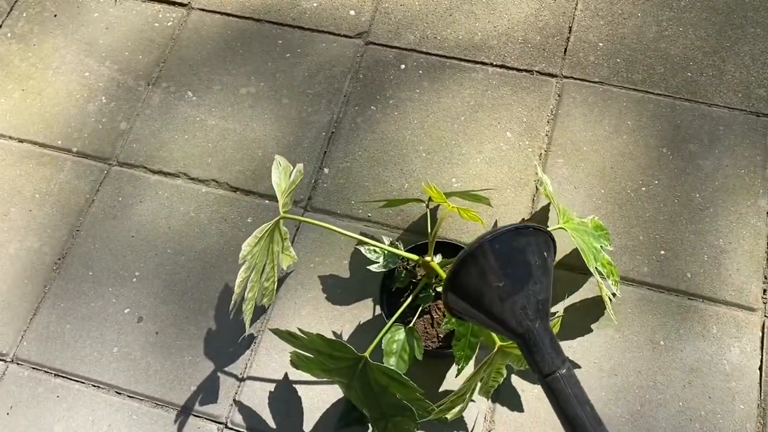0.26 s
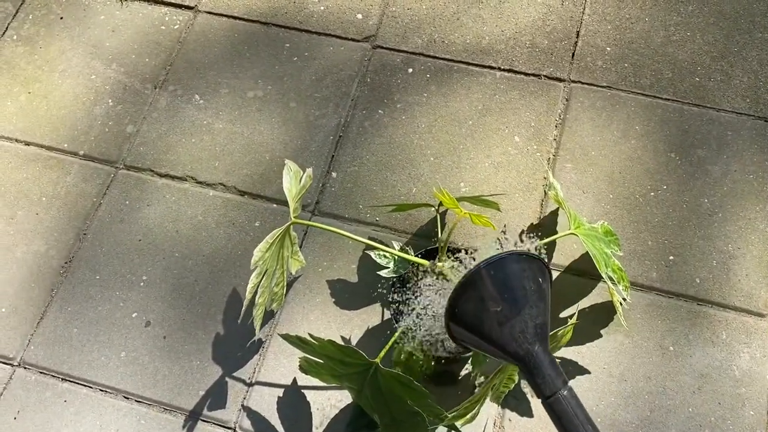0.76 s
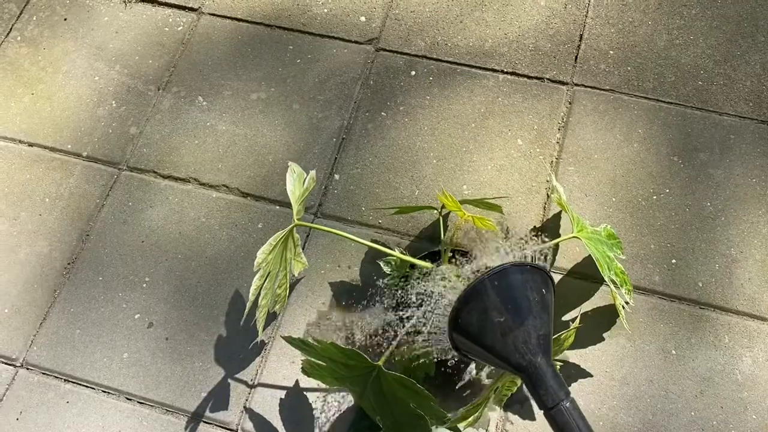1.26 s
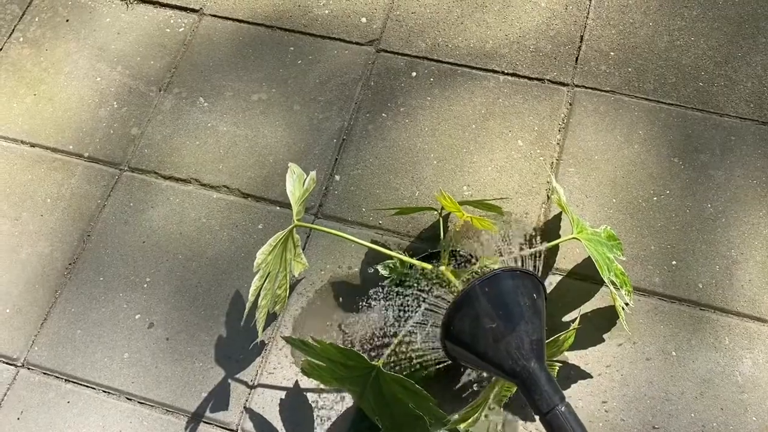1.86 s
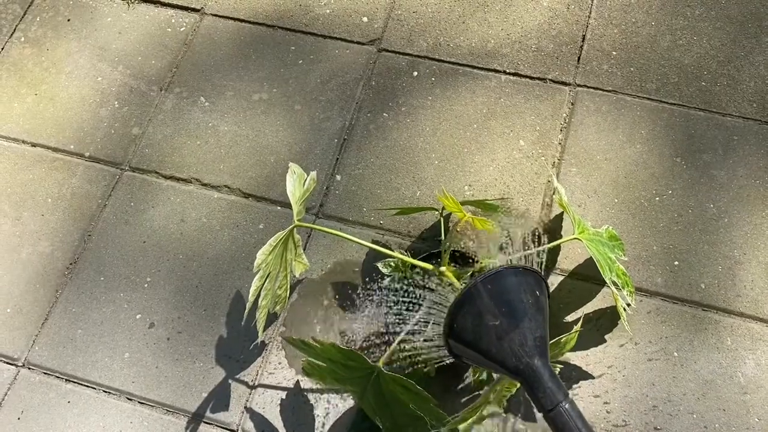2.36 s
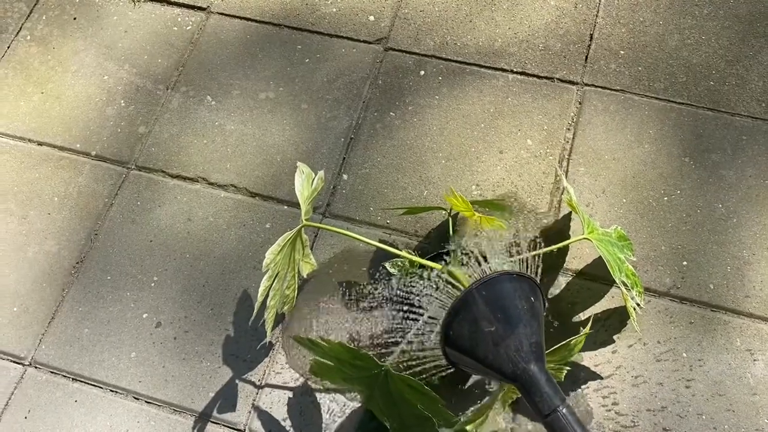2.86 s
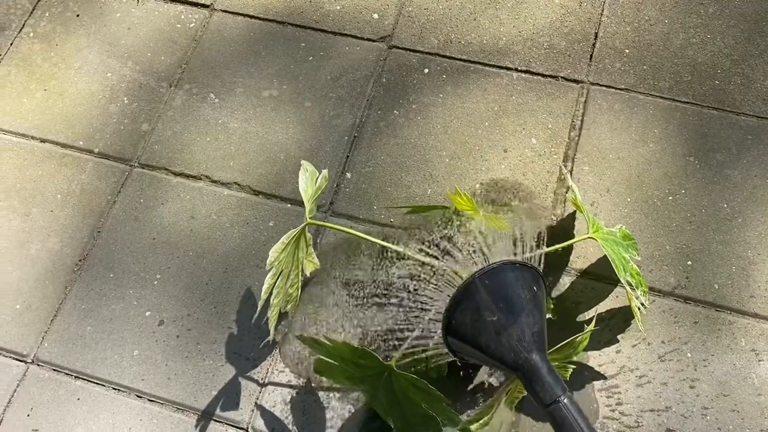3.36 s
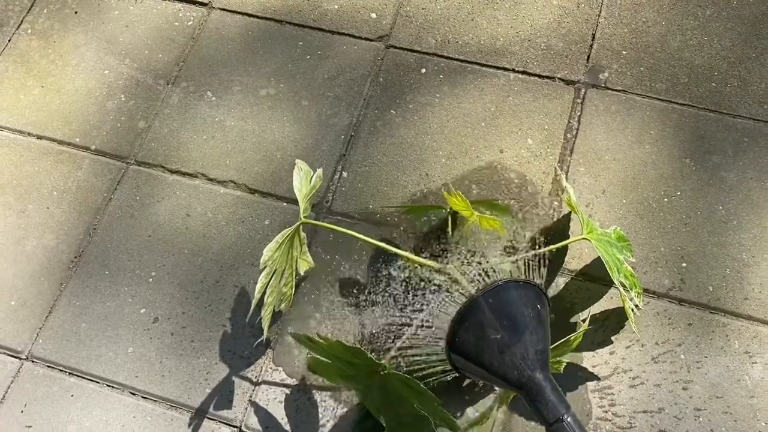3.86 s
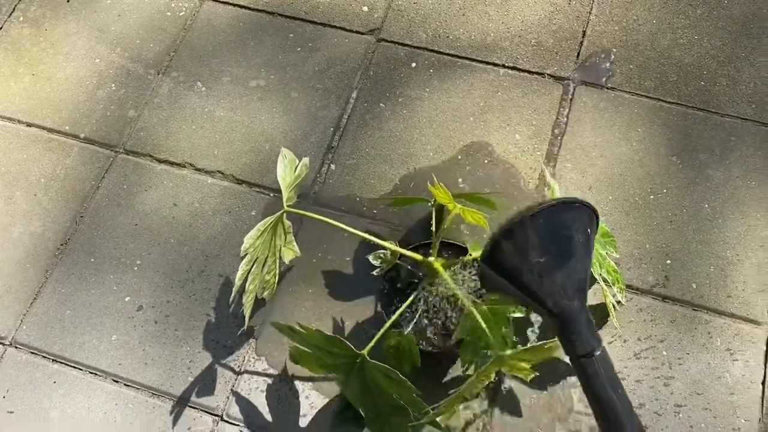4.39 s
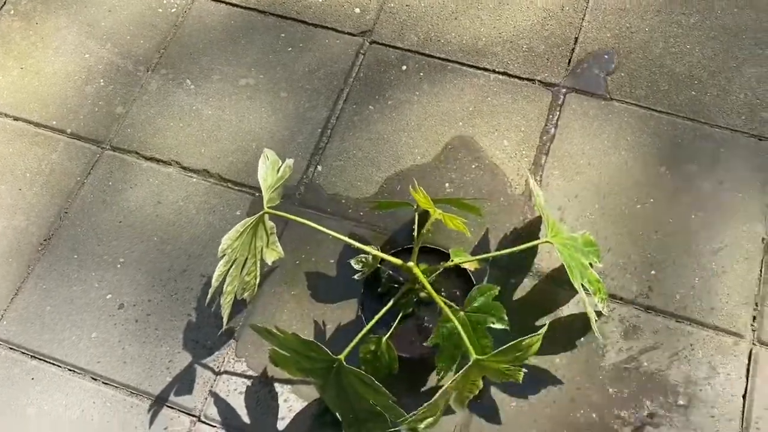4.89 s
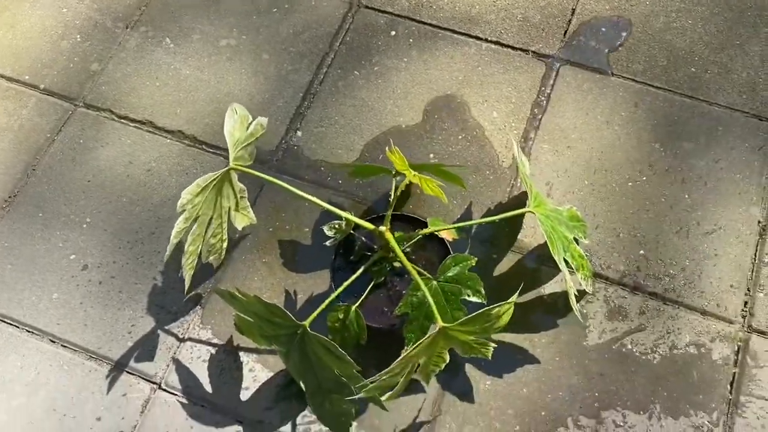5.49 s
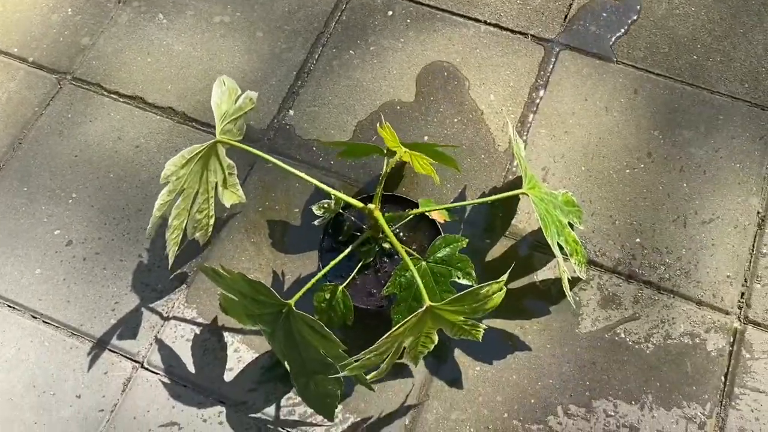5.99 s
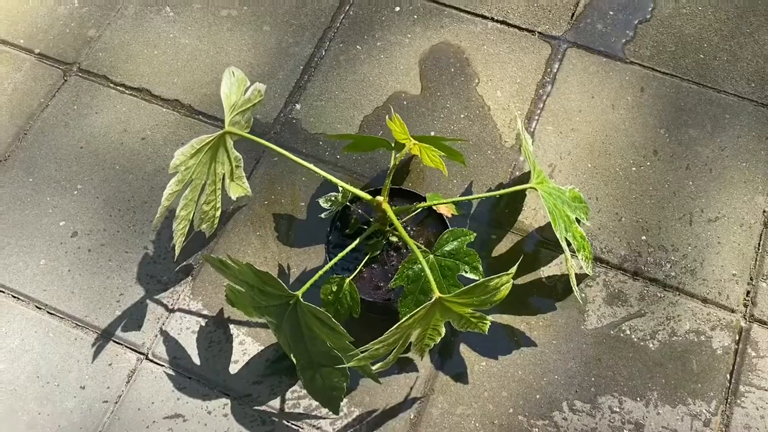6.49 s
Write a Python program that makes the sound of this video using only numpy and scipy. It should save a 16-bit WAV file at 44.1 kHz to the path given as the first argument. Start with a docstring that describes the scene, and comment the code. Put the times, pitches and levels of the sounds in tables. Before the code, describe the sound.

On a paved patio, a plastic watering can gurgles and starts showering a potted plant. Drops patter on leaves and wet soil while fine jets hiss and splat on the stone. After about five seconds the water dwindles to drips, and the can is set down with hollow, gritty knocks, rocking and sliding briefly. The sound is close and in stereo, with faint traffic rumbling far away.

```python
"""On a paved patio, a plastic watering can showers a potted plant through its sprinkler head.
Drops patter on leaves and wet soil, fine jets hiss on the stone, big drops splat and the water gurgles.
The can is set down: it knocks and rocks, its walls ring, the air inside hums and its base slides on sand.
Far traffic rumbles and a bird whistles faintly. Left and right are heard a few centimetres apart."""
import sys
import numpy as np
from scipy import signal
from scipy.fft import rfft, irfft, next_fast_len
from scipy.io import wavfile

SR = 44100
rng = np.random.default_rng(int(sys.argv[2]) if len(sys.argv) > 2 else 0)


def store_wav(level_fs):
    """Save 16-bit WAV to argv[1]."""
    pcm = np.round(np.clip(np.atleast_2d(level_fs), -1, 1) * 32767)
    wavfile.write(sys.argv[1], SR, pcm.T.astype(np.int16))


N = 297357
AHEAD_LAG_S, ASIDE_LAG_S = 2.3e-5, 1.81e-4   # left-side delay for the plant ahead and the paving aside


def from_db(db):
    """Turn decibels into a multiplier."""
    return 10 ** (np.asarray(db) / 20)


def unit_level(x):
    """Scale a sound to an average (rms) level of 1."""
    return x / np.sqrt(np.mean(x ** 2) + 1e-20)


def over_time(rows):
    """Join rows of (time_s, values...) with straight lines: one curve for each value column."""
    times_s, *columns = np.transpose(rows)
    return [np.interp(np.arange(N) / SR, times_s, column) for column in columns]


def at_pitch(points, hz):
    """Read between the rows of a (pitch_hz, value) table."""
    pitches_hz, values = np.transpose(points)
    return np.interp(np.log(hz), np.log(pitches_hz), values)


def drift(rate_hz):
    """A smooth random wobble of typical size 1; a higher rate wobbles faster."""
    r = np.exp(-80 * np.pi * rate_hz / SR)
    slow = signal.lfilter([1], [1, -2 * r, r * r], rng.standard_normal(N // 40 + 2002))[2000:]
    return np.interp(np.arange(N) / 40, np.arange(len(slow)), unit_level(slow))


def ring(push, hz, fade_s):
    """A pushed object rings at one pitch. Here and below, a fade time is the time to fall by 60 dB."""
    r, w = from_db(-60 / (fade_s * SR)), 2 * np.pi * hz / SR
    return signal.lfilter([0, np.sin(w)], [1, -2 * r * np.cos(w), r * r], push + 1e-18)


def grains(per_s, spread_db):
    """Tiny impacts: random clicks of uneven size."""
    sizes = from_db(spread_db * np.minimum(rng.exponential(1, N), 5)) * rng.choice([-1, 1], N)
    return unit_level(sizes * (rng.random(N) < per_s / SR))


def bands(sources, spectrum, flicker_db, flicker_hz):
    """Yield (pitch, sound) for flickering third-octave bands, cut from two sources in turn."""
    together, edges = drift(2.5), 20 * 2 ** np.arange(0, 10, 1 / 3)
    for k, (low, high) in enumerate(zip(edges, edges[1:])):
        hz = np.sqrt(low * high)
        if spectrum[0][0] < hz * 1.2 and hz < spectrum[-1][0] * 1.2:
            band = signal.sosfilt(signal.butter(2, [low, high], "band", fs=SR, output="sos"), sources[k % 2])
            flicker = 0.3 * together + drift(flicker_hz)
            yield hz, band * from_db(at_pitch(spectrum, hz) + flicker_db * flicker)


def left_and_right(sound, lag_s):
    """The housing between two microphones colours each side differently; the left one hears later."""
    # How much louder the left side is: pitch_hz, difference_db
    tilt = [(400, 1.5), (700, -5), (1300, 5), (2400, 7.5), (4400, 6), (8100, 3.5), (15000, -2.5)]
    size = next_fast_len(N + 512)
    hz = np.arange(size // 2 + 1) * SR / size
    half = from_db(at_pitch(tilt, hz + 1) / 2) * np.exp(-1j * np.pi * hz * lag_s)
    return irfft(rfft(sound, size) * [half, 1 / half], size)[:, :N]


def traffic():
    """Far traffic blends into a smooth rumble, nearly the same on both sides in the bass."""
    # Tone of the rumble: pitch_hz, relative_db
    spectrum = [(12, -46), (20, -19.5), (74, -1.5), (241, -15.5), (332, -21.5), (538, -21), (762, -20.5),
                (1450, -26.5), (3060, -40.5), (5380, -92), (22000, -120)]
    # Its slow rise and fall: time_s, level_db
    swell = [(0, -53.5), (1, -52), (2, -52), (3, -54), (4, -57), (5, -54), (5.6, -57.5), (6.74, -57.5)]
    # How alike left and right are: pitch_hz, likeness (1 = the same)
    likeness = [(60, 0.96), (250, 0.81), (700, 0.33), (4000, 0.048)]
    out, noise = 0, rng.standard_normal((2, 2, N))
    for hz, (middle, side) in bands(noise, spectrum, flicker_db=1.92, flicker_hz=3.53):
        alike = at_pitch(likeness, hz)
        out = out + np.sqrt(1 + alike) * middle + np.sqrt(1 - alike) * side * [[1], [-1]]
    return from_db(over_time(swell)[0]) * unit_level(out)


def shower():
    """Water patters on the plant ahead and sprays the paving aside, with splats and sounds from the can."""
    # Level of patter and hiss: the shower until about 5.4 s, then faint dripping as the can is set down:
    # time_s, patter_db, spray_db
    levels = [(0, -74, -99), (.45, -70, -82), (.8, -64.5, -64.5), (1.15, -65.5, -64), (1.36, -62.5, -59),
              (2.1, -63, -57.5), (2.45, -61.5, -55), (3.0, -60, -58), (3.3, -58.5, -55.5),
              (3.9, -58, -57.5), (4.4, -64.5, -59), (4.8, -66.5, -61), (5.0, -65, -69), (5.25, -69.5, -73),
              (5.45, -76.5, -83.5), (5.78, -87, -79.5), (6.0, -71, -77), (6.74, -72, -75)]
    # Tone of drops on leaves and puddle: pitch_hz, relative_db
    patter_tone = [(300, 3.5), (600, -8), (1200, 1.5), (1800, 1.5), (2600, 3.5), (3600, -1), (4800, 1),
                   (6200, -14), (8000, -43)]
    # Tone of the fine jets: pitch_hz, relative_db
    spray_tone = [(4200, -7), (5500, -4.5), (7000, 7), (8600, 3.5), (11000, 2.5), (13500, 14.5),
                  (16000, -11)]
    patter_db, spray_db = over_time(levels)
    on_plant, on_paving = splats()
    patter = droplets(patter_tone, per_s=3000, spread_db=2.7, scatter_db=-6)
    patter += from_db(-11.5) * soil_plips(2050, 4050, per_s=90, spread_db=5)
    patter += from_db(-8.5) * plinks(2380, 4940, per_s=200, cycles=11, spread_db=1)
    spray = droplets(spray_tone, per_s=7000, spread_db=4, scatter_db=-11.5)
    spray += from_db(-17) * plinks(4450, 14000, per_s=200, cycles=22, spread_db=2.5)
    smallest_drops = grains(per_s=60 * from_db(4 * drift(1.6)), spread_db=2.7)
    spray += from_db(-10) * unit_level(snaps(smallest_drops))
    ahead = from_db(patter_db) * patter + on_plant + gurgles_and_can_notes() + bumps() + hollow_hum()
    aside = from_db(spray_db) * spray + on_paving
    return left_and_right(ahead, AHEAD_LAG_S) + left_and_right(aside, ASIDE_LAG_S)


def droplets(spectrum, per_s, spread_db, scatter_db):
    """Thousands of impacts a second blur together; a scattered share is opposite in left and right."""
    drops = [[grains(per_s, spread_db) for _ in range(2)] for _ in range(2)]
    direct, scattered = sum(band for _, band in bands(drops, spectrum, flicker_db=4, flicker_hz=24))
    return unit_level(direct + from_db(scatter_db) * scattered * [[1], [-1]])


def plip(hz, cycles=8.2, rise=0.098):
    """A trapped bubble swells, rings and rises in pitch; one row of sound for each pitch given."""
    age = np.arange(600) / SR * np.reshape(hz, (-1, 1)) / cycles
    shape = 4 * age * np.exp(1 - 4 * age)
    return shape * np.sin(2 * np.pi * cycles * age * (1 - rise / 2 + rise * age))


def soil_plips(low_hz, high_hz, per_s, spread_db):
    """Drops fall in bunches on the puddled soil, each making a bubble."""
    starts = np.flatnonzero(rng.random(N) < per_s * from_db(3.5 * drift(13)) / SR)
    pitch, size = rng.random((2, N))[:, starts]
    gains = from_db(-spread_db * np.log(.01 + size))
    bubbles = plip(low_hz * (high_hz / low_hz) ** pitch) * gains[:, None]
    out = np.zeros(N + 600)
    np.add.at(out, starts[:, None] + np.arange(600), bubbles)
    return unit_level(out[:N])


def plinks(low_hz, high_hz, per_s, cycles, spread_db):
    """Drops come in clusters; each traps a bubble that rings briefly at one of twelve steady pitches."""
    clicks = grains(per_s * from_db(3.8 * drift(13)), spread_db)
    out, pitch_choice = 0, rng.integers(0, 12, N)
    for k, hz in enumerate(np.geomspace(low_hz, high_hz, 12)):
        rounded_start = ring(clicks * (pitch_choice == k), hz, 6 / hz)
        out = out + ring(rounded_start, hz, cycles / hz)
    return unit_level(out)


def snaps(clicks, low_hz=5000, fade_s=.006):
    """A drop snaps as it hits: each click becomes a short bright crack."""
    t = np.arange(1000) / SR
    burst = rng.standard_normal(len(t)) * from_db(-60 * t / fade_s)
    crack = signal.sosfilt(signal.butter(2, low_hz, "high", fs=SR, output="sos"), burst)
    return signal.fftconvolve(clicks, crack / np.abs(crack).max())[:N]


def bird():
    """A far bird gives a thin, wavering whistle that steps down in pitch."""
    # Path of the whistle: time_s, pitch_hz, level_db
    song = [(.08, 5450, -95), (.13, 5450, -84), (.19, 5420, -95), (.215, 5320, -79), (.24, 5280, -90),
            (.25, 4900, -84), (.28, 4870, -78), (.3, 4870, -90), (.41, 4900, -92)]
    hz, level_db = over_time(song)
    t = np.arange(N) / SR
    singing = np.clip(np.minimum(t - song[0][0], song[-1][0] - t) / 0.03, 0, 1)
    phase = 2 * np.pi * np.cumsum(hz * (1 + 0.004 * drift(120))) / SR
    return singing * from_db(level_db + 3.1 * drift(40)) * np.sqrt(2) * np.sin(phase)


def fading_tones(rows, octaves_per_s):
    """Each row rings as a pure, dying tone whose pitch may glide for the first 0.05 s."""
    out, t = np.zeros(N + 16000), np.arange(16000) / SR
    for start_s, level_db, hz, fade_s in rows:
        phase = 2 * np.pi * np.cumsum(hz * 2 ** (octaves_per_s * np.minimum(t, .05))) / SR
        onset = (1 - np.exp(-t * hz * 2.5)) ** 2
        out[round(start_s * SR):][:16000] += from_db(level_db - 60 * t / fade_s) * onset * np.sin(phase)
    return out[:N]


def gurgles_and_can_notes():
    """Short tones that rise a little and flutter: gurgles in the water, and notes of the can as it knocks."""
    # Short ringing tones: start_s, level_db, pitch_hz, fade_s
    tones = [(.472, -31.5, 392, 0.049), (.472, -37, 643, 0.024), (.486, -31.5, 399, 0.06),
             (.5975, -42.5, 820, 0.028), (.727, -39, 745, 0.048), (.9255, -28.5, 403, 0.029),
             (.937, -31.5, 445, 0.028), (.955, -45, 372, 0.087), (4.428, -52.5, 372, 0.18),
             (4.798, -30.5, 376, 0.075), (4.94, -37, 450, 0.037), (4.958, -39.5, 507, 0.057),
             (4.985, -39.5, 1850, 0.027), (4.986, -33, 354, 0.056), (5.003, -39, 1390, 0.034),
             (5.015, -30.5, 346, 0.065), (5.307, -45, 925, 0.081), (5.343, -33, 765, 0.066),
             (5.446, -51.5, 965, 0.077), (5.328, -46, 1700, 0.064), (5.443, -47, 1320, 0.017),
             (5.805, -35, 1514, 0.058), (5.806, -27, 1663, .05), (5.888, -33, 1697, 0.029),
             (5.968, -48, 1500, 0.032), (6.036, -31, 894, 0.023), (6.038, -45.5, 464, 0.23),
             (6.266, -41, 1280, 0.065), (6.281, -37, 1240, 0.035), (6.294, -37, 670, 0.038),
             (6.345, -43, 434, 0.036), (6.417, -32.5, 420, 0.027)]
    return fading_tones(tones, octaves_per_s=1.24) * from_db(3.5 * drift(112))


def splats():
    """Big drops burst into a dying spatter: lower ones on the plant, higher ones on the paving."""
    # The biggest drops landing: start_s, level_db, pitch_hz
    drops = [(0.4874, -53, 2550), (0.519, -54.5, 2040), (0.533, -55, 2000), (0.5766, -46, 1690),
             (0.602, -44, 1780), (0.646, -51, 2620), (0.683, -59, 3100), (0.723, -48, 1096),
             (0.735, -46, 2130), (0.7495, -50.5, 2880), (1.029, -47, 2860), (1.0632, -50.5, 3000),
             (1.2065, -34.5, 11000), (1.234, -38.5, 10400), (1.3044, -36, 8100), (1.349, -50, 3000),
             (1.364, -45, 5700), (1.394, -42.5, 5300), (1.435, -50, 4860), (1.506, -49.5, 2880),
             (1.534, -38, 7800), (1.55, -44, 7000), (1.57, -51, 2400), (1.621, -45, 7100),
             (1.899, -39.5, 7600), (1.928, -39.5, 10300), (1.96, -34.5, 10600), (2.021, -42, 10800),
             (2.169, -42, 4730), (2.2305, -45.5, 9900), (2.247, -35, 7800), (2.2674, -40, 10400),
             (2.285, -31, 13000), (2.303, -40, 8900), (2.343, -45, 2240), (2.347, -38, 10500),
             (2.4131, -43, 7700), (2.4406, -47, 4530), (2.489, -34, 12400), (2.511, -33.5, 10600),
             (2.7237, -29.5, 7400), (2.842, -43, 4800), (2.9163, -42, 13100), (2.9353, -45.5, 4440),
             (2.9835, -44.5, 2530), (3.2792, -36.5, 10500), (3.3171, -38, 7000), (3.337, -50, 2920),
             (3.3538, -46.5, 2930), (3.4055, -40, 3030), (3.434, -41, 7400), (3.442, -50, 3600),
             (3.463, -48, 7450), (3.5166, -43, 7300), (3.6086, -46, 2640), (3.632, -52, 2760),
             (3.726, -49, 2490), (3.756, -46, 2430), (3.796, -50, 2600), (3.863, -55, 2100),
             (3.871, -50, 2780), (3.883, -56, 2730), (3.932, -48, 2360), (3.9405, -50, 2270),
             (3.9737, -39, 6050), (3.9753, -43.5, 3050), (4.2107, -39, 6470), (4.2262, -39, 4500),
             (4.2594, -38.5, 2920), (4.3456, -44, 3140), (4.436, -41.5, 4530), (4.448, -38.5, 5040),
             (4.594, -36, 7700), (4.6463, -41, 10700), (4.673, -40.5, 12100), (4.7156, -37, 13300),
             (4.738, -43, 11000), (4.7554, -40, 11700), (4.839, -54, 9000), (4.8983, -38, 10870),
             (4.938, -45.5, 3200), (4.938, -35, 6900), (4.958, -31.5, 6900), (5.0466, -36, 7250),
             (5.069, -41, 10300), (5.1362, -32.5, 12500), (5.151, -45, 8900), (5.193, -44.5, 7560),
             (5.2162, -52.5, 2930), (5.262, -52, 2900)]
    out, paving_clicks, t = np.zeros((2, N + 4000)), np.zeros(N), np.arange(4000) / SR
    shape = (len(drops), 4000)
    spatters = rng.standard_normal(shape) * from_db(2 * rng.exponential(1, shape))
    spatters *= 1 + from_db(15) * np.exp(-t / .0025)   # the burst is stronger than what follows
    spatters *= 1 - np.exp(-t / .0005)   # and takes a moment to swell
    for (start_s, level_db, hz), spatter in zip(drops, spatters):
        start, paving = round(start_s * SR), int(hz > 5500)
        fade_s, cycles = (0.34, 7) if paving else (0.027, 20)
        push = np.diff(spatter * from_db(-60 * t / fade_s), prepend=0)
        burst = ring(push, hz, cycles / hz)
        burst = ring(burst, hz, 0.56 / hz)   # rounds off the tone
        burst /= np.abs(burst).max()
        if hz < 4200:   # low drops also trap a bubble
            burst *= from_db(2)
            burst[:600] += plip(hz)[0]
        out[paving, start:][:4000] += from_db(level_db) * burst
        paving_clicks[start] = paving * from_db(level_db + 0.5)
    on_plant, on_paving = out[:, :N]
    return on_plant, on_paving + snaps(paving_clicks)


def bumps(fade_s=0.079):
    """Dull, low bumps sag in pitch as they die."""
    # Bumps: start_s, level_db, pitch_hz
    thuds = [(0.655, -30.5, 116), (3.997, -31, 78), (4.944, -32, 174), (5.005, -27.5, 88),
             (5.293, -38, 144)]
    return fading_tones([(*row, fade_s) for row in thuds], octaves_per_s=-2.5)


def can_knocks(shell_from_hz=890, grit_split_hz=2300):
    """Each knock on the stone is a short gritty rub that rasps and rings the can's body and shell."""
    # Can against stone: start_s, ring_db, grit_db, spot_pitch_hz, fade_s
    contacts = [(4.7898, -39.5, -74, 624, 0.022), (4.937, -45, -33, 420, 0.044),
                (4.959, -39, -62, 483, 0.16), (4.983, -47, -35, 550, 0.14), (4.999, -36, -58, 1400, 0.023),
                (5.0175, -39, -33.5, 388, 0.0096), (5.082, -51, -42, 400, 0.092),
                (5.2118, -50, -62, 945, 0.037), (5.289, -40.5, -51, 479, 0.022),
                (5.303, -40, -52, 950, 0.094), (5.3235, -40.5, -53, 500, 0.22),
                (5.442, -48, -76, 880, 0.019), (5.7893, -29, -29.5, 1950, 0.2),
                (5.799, -35.5, -23.5, 1580, 0.056), (5.8052, -25.5, -19.5, 1730, 0.054),
                (5.823, -31, -36, 450, 0.05), (5.838, -38, -36.5, 500, 0.36),
                (5.867, -36, -36.5, 1070, 0.17), (5.887, -34.5, -38, 1290, 0.029),
                (5.9662, -45.5, -36, 1044, 0.023), (6.033, -39, -36, 790, 0.033),
                (6.039, -35, -52, 960, 0.02), (6.0933, -44, -51, 422, 0.08), (6.1424, -41, -46, 960, 0.028),
                (6.19, -41, -43.5, 1200, 0.036), (6.261, -38, -53, 870, 0.017),
                (6.278, -32, -35, 1140, 0.023), (6.3703, -47.5, -45, 1210, 0.016),
                (6.389, -43, -40, 860, 0.13), (6.416, -37.5, -68, 425, 0.018),
                (6.478, -48.5, -50, 766, 0.24), (6.733, -36, -48.5, 418, 0.15)]
    # Tone of the rasp: pitch_hz, relative_db
    grit_tone = [(1800, 14), (2800, 7), (5000, 12), (7000, 21), (8700, 15.5), (12000, 18.5), (16000, 12)]
    # The can's natural tones: pitch_hz, relative_db, fade_s
    can_tones = [(401, -2, 0.29), (451, 3.5, 0.11), (542, -1.5, 0.073), (733, -4.5, 0.042),
                 (864, -2, 0.019), (1040, -0.5, 0.018), (1273, 3, 0.02), (1514, 7.5, 0.02),
                 (1663, -2.5, 0.012), (2130, -4, 0.0099), (2380, 4.5, 0.0076), (2570, -2, 0.017),
                 (3130, -3, 0.027)]
    hollow_body = [tone for tone in can_tones if tone[0] < 900]
    thin_shell = [tone for tone in can_tones if tone[0] >= 900]
    rub, t = grains(per_s=12000, spread_db=2.5), np.arange(8000) / SR
    hz = np.arange(N // 2 + 1) * SR / N + 1
    rasp_spectrum = rfft(rub) * from_db(at_pitch([(600, -60)] + grit_tone, hz))
    treble_share = 1 / (1 + (grit_split_hz / hz) ** 4)
    dull, bright = irfft(rasp_spectrum * [1 - treble_share, treble_share], N)
    # The contact is soft, so little treble goes into the ringing.
    soft_rub = signal.sosfilt(signal.butter(4, 3540, fs=SR, output="sos"), rub)
    out, chances = np.zeros((2, N)), rng.standard_normal((len(contacts), 2, 2, 8))
    for (start_s, ring_db, grit_db, spot_hz, fade_s), (shell_chance, body_chance) in zip(contacts, chances):
        at = slice(round(start_s * SR), round(start_s * SR) + 8000)
        age_s = t[:len(rub[at])]
        fade_db = -60 * age_s / fade_s
        push = (1 - np.exp(-age_s / 0.0034)) * from_db(fade_db) * soft_rub[at]
        grit = from_db(fade_db) * dull[at] + from_db(0.97 * fade_db) * bright[at]
        grit *= 1 - np.exp(-age_s / 0.000076)   # the rasp starts ahead of the ringing
        lean_db = 14 * np.log2(spot_hz / shell_from_hz)   # high spots favour the shell, low ones the body
        knock = from_db(grit_db) * grit / np.abs(grit).max()
        knock += from_db(ring_db + min(lean_db, 0)) * can_ring(thin_shell, push, spot_hz, shell_chance)
        knock += from_db(ring_db - max(lean_db, 0)) * can_ring(hollow_body, push, spot_hz, body_chance)
        pan_db = 4.5 * body_chance[0, -1]   # the can turns a little at each knock
        out[:, at] += knock * from_db([[pan_db / 2], [-pan_db / 2]])
    return left_and_right(out, ASIDE_LAG_S)


def can_ring(tones, push, spot_hz, chance):
    """Tones near the struck spot's pitch answer most; water moving inside retunes them a little."""
    out = 0
    for (hz, level_db, fade_s), strength, slosh in zip(tones, *chance):
        nearness_db = -5 * np.log2(hz / spot_hz) ** 2
        # A longer ring gathers more of the rub, so divide that out.
        gain = from_db(level_db + nearness_db + 2 * strength) / (hz * np.sqrt(fade_s))
        out = out + gain * ring(np.diff(push, prepend=0), hz * (1 + 0.045 * slosh), fade_s)
    return out / np.abs(out).max()


def hollow_hum(fade_s=0.62):
    """The air in the can hums when it lands, wavering in level."""
    # Landings: start_s, level_db, pitch_hz
    hums = [(5.018, -43, 225.8), (5.821, -46.5, 240.4)]
    return fading_tones([(*row, fade_s) for row in hums], octaves_per_s=0) * from_db(3 * drift(29))


def can_slide(rise_s=0.014, fall_db_per_s=455):
    """Fine sand under the sliding base makes a dense, even hiss."""
    # Slides over the slab: start_s, length_s, level_db
    slides = [(6.522, 0.042, -46), (6.675, 0.0094, -56)]
    # Tone of the sand: pitch_hz, relative_db
    sand_tone = [(1100, -14), (2200, -2), (3500, -7), (6000, -1.5), (8700, -2.5), (11000, -3), (15000, -15)]
    sand, t = rng.standard_normal((2, N)), np.arange(N) / SR
    hiss = unit_level(sum(band for _, band in bands(sand, sand_tone, flicker_db=1, flicker_hz=30)))
    level = np.zeros(N)
    for start_s, length_s, level_db in slides:
        onset = np.clip((t - start_s) / rise_s, 0, 1)
        level += onset * from_db(level_db - fall_db_per_s * np.maximum(t - start_s - length_s, 0))
    return left_and_right(level * hiss, ASIDE_LAG_S)


def patio_echo(sound, fade_s, echo_db):
    """Walls and slabs send back a short wash with little bass, different on each side."""
    t = np.arange(round(.3 * SR)) / SR
    tail = rng.standard_normal((2, len(t))) * from_db(-60 * t / fade_s) * (t > .004)
    tail = signal.sosfilt(signal.butter(1, [500, 5000], "band", fs=SR, output="sos"), tail)
    tail /= np.sqrt(np.sum(tail ** 2) / 2)
    return sound + from_db(echo_db) * signal.fftconvolve(sound, tail, axes=1)[:, :N]


def scene():
    """The water and the can echo on the patio, over the far traffic and the bird."""
    water = patio_echo(shower(), fade_s=0.24, echo_db=-11.5)
    can = patio_echo(can_knocks() + can_slide(), fade_s=0.12, echo_db=-9)
    return water + can + traffic() + bird()


def record(dry):
    """The highest treble is cut steeply: 60 dB down from 16400 Hz upward."""
    return signal.sosfilt(signal.cheby2(16, 60, 16400, fs=SR, output="sos"), dry)


dry = scene()
out = record(dry)
store_wav(out)
```